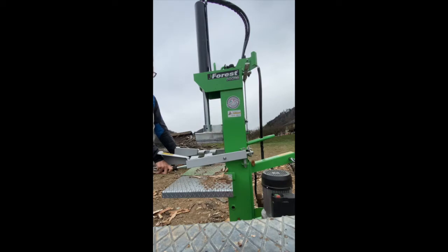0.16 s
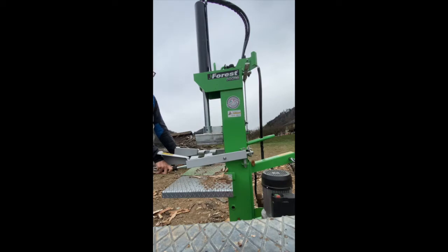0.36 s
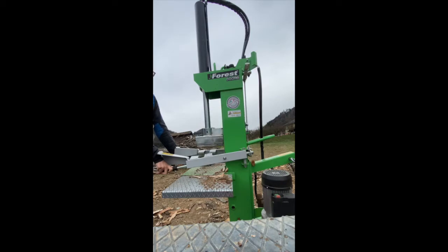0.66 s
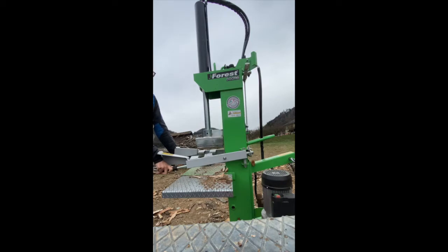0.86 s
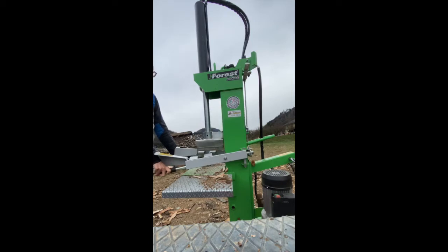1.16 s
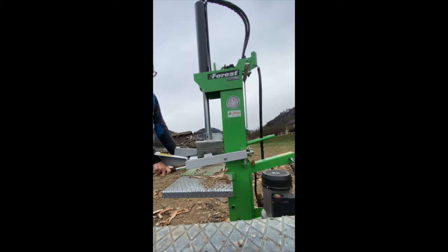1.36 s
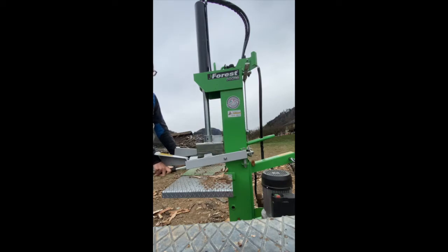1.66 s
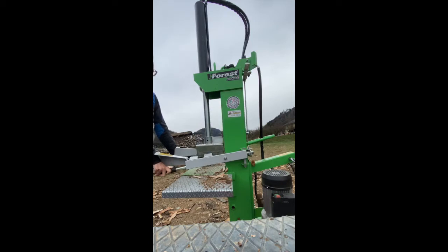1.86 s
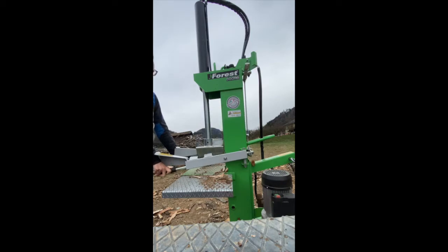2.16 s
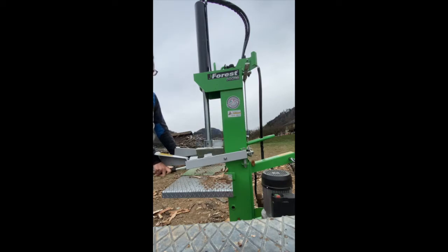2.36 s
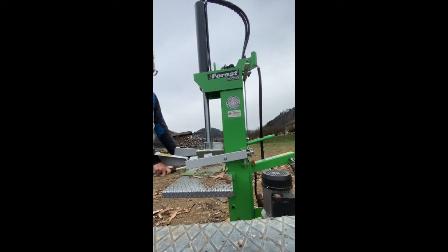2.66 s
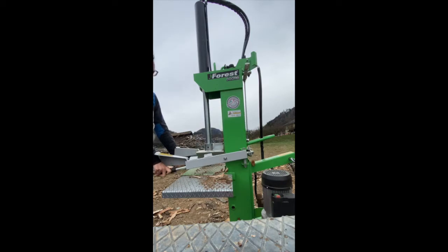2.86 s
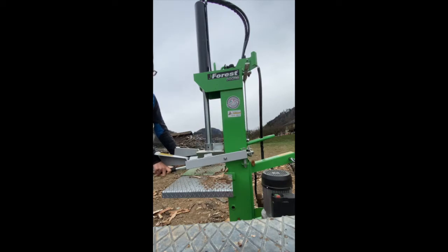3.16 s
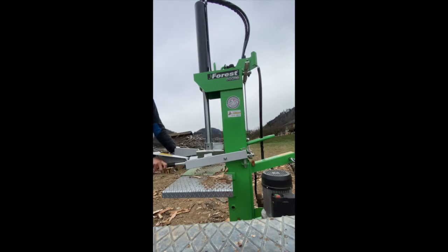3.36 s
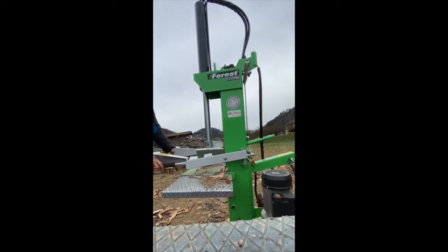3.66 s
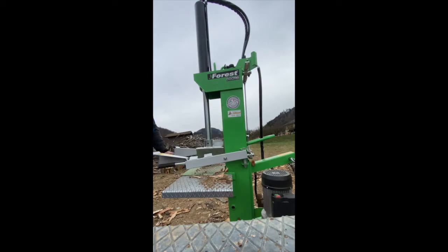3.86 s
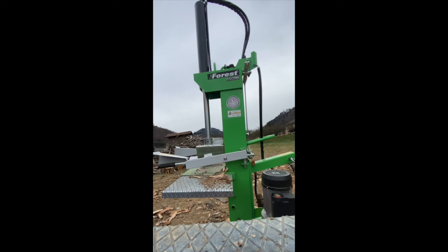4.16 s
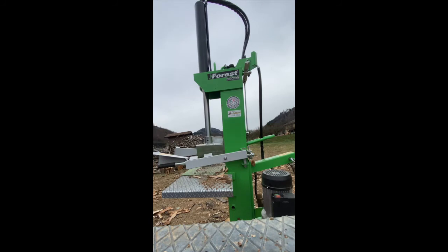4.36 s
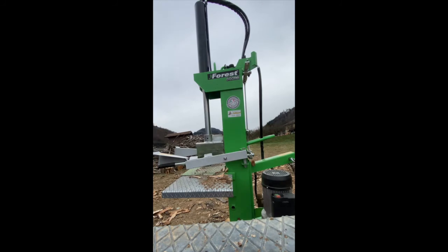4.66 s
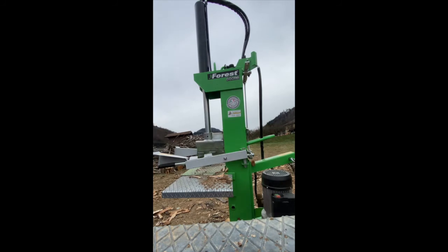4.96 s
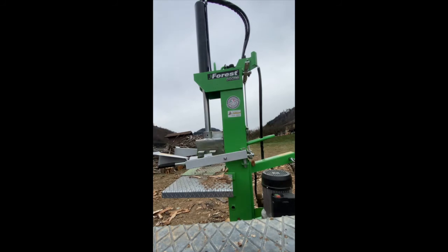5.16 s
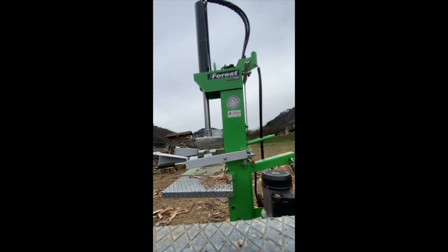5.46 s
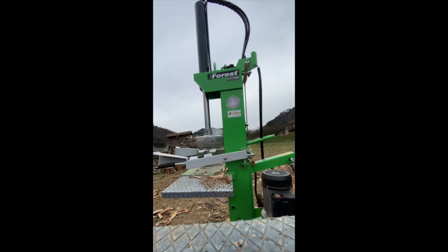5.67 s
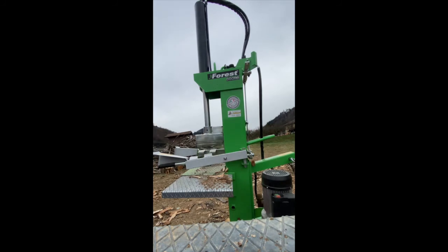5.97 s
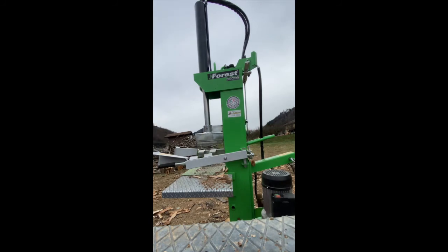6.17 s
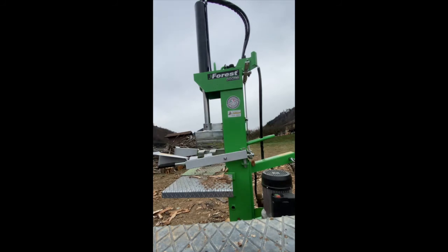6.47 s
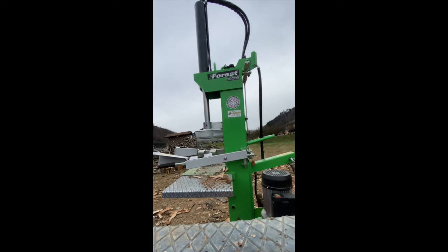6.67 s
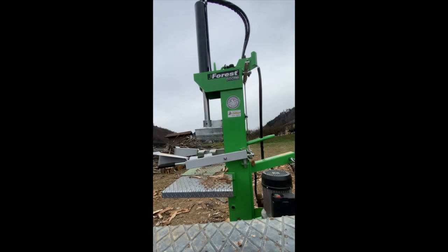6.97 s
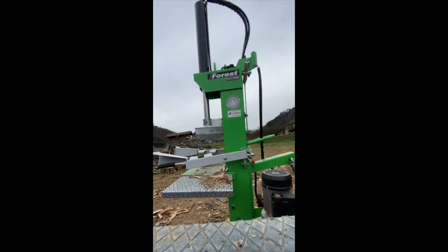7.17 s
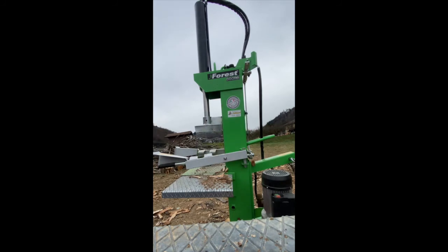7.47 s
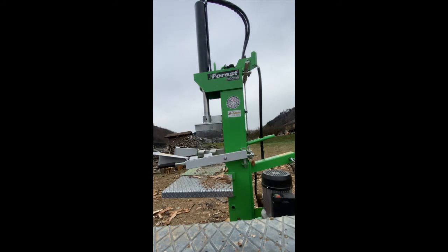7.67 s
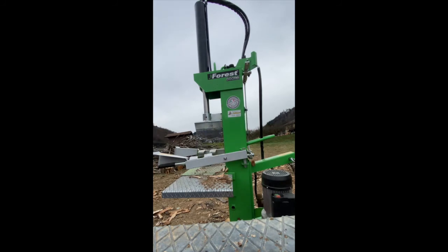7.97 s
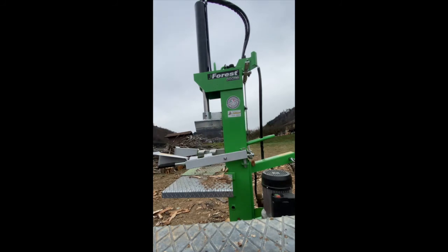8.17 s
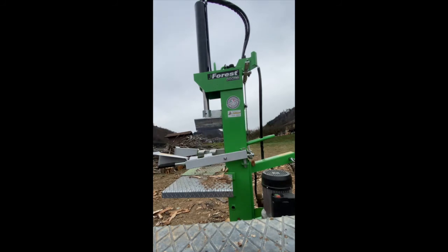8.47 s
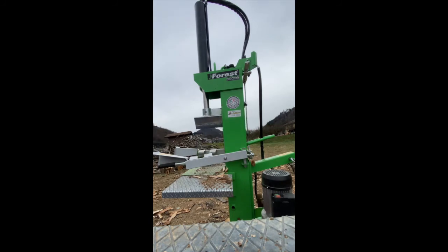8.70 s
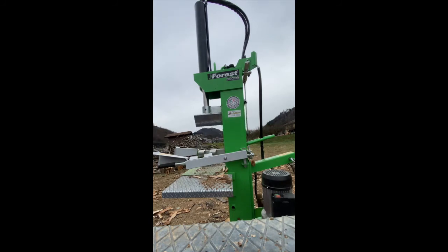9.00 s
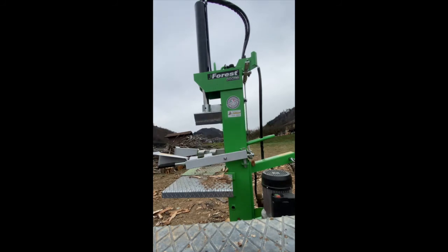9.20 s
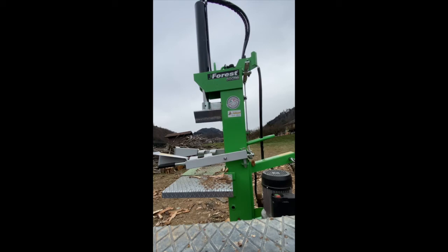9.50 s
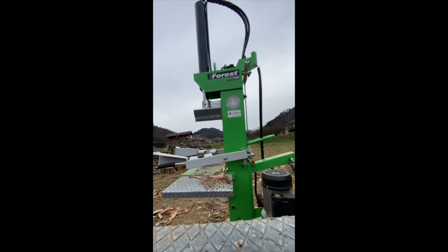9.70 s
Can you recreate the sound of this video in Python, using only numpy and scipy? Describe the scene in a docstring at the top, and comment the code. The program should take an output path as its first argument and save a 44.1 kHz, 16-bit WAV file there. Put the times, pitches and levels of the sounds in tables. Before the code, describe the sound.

Steady mid-pitched motor and gear pump whine sags under load, cuts out briefly, metal lever clatters, whine returns brighter while wind buffets the microphone.

```python
"""Gear pump and lever in a windy field

An electric motor whines through a nine-tooth gear pump on a steel splitter frame: sines at multiples of shaft rate.
The mesh tone sags under load, drops out as the valve centres and returns as the lever clanks over (ringing modes
and noise). Shaped oil and fan noise throbs once a turn; low noise and falling thumps are wind on the microphones."""
import sys
import numpy as np
from scipy import signal
from scipy.fft import rfft, irfft
from scipy.io import wavfile
from scipy.ndimage import uniform_filter1d

SR = 44100
rng = np.random.default_rng(int(sys.argv[2]) if len(sys.argv) > 2 else 0)


def dump_mix(stems):
    """Bounce the given channels to the path in sys.argv[1] as a 16-bit WAV at rate SR."""
    frames = np.atleast_2d(stems).T  # one column per channel
    limited = np.clip(frames, -1, 1)  # hard clip at full scale
    pcm = np.round(limited * 32767).astype(np.int16)
    wavfile.write(sys.argv[1], SR, pcm)


N = 433944
T = np.arange(N) / SR
BINS = np.maximum(np.arange(N // 2 + 1) * SR / N, 1)  # spectrum bins, Hz

# mesh rates at which the frame's radiation is tabled: f/Hz
RATES_HZ = (407.2, 409, 412, 416, 429, 434, 438)
# stereo tilt of the mesh tone at those rates: left minus right level/dB
MESH_PAN_DB = (-0.5, -.5, -0.5, 1, 3, 4, 10)
# loudness of the mesh tone: t/s, level/dB
MESH_LEVEL = [(0, -16.5), (.5, -19), (.9, -16.5), (2.49, -18), (2.53, -23), (2.59, -20.5), (2.74, -19.5),
              (2.834, -29), (2.882, -48), (2.934, -41.5), (3.13, -38.5), (3.228, -22), (3.246, -30),
              (3.266, -21.5), (3.3, -20.5), (3.35, -22), (3.5, -18.5), (4.0, -21.5), (5.0, -22),
              (8.8, -23.5), (9.84, -23.5)]
# mesh overtones and strong sidebands of the third, before fades: multiple of the shaft rate, level/dB at RATES_HZ
OVERTONES = {26: (-57, -66, -49.5, -47.5, -64, -58, -58), 28: (-39, -38, -38, -40.5, -67, -59.5, -50),
             18: (-39, -36.5, -40.5, -47, -55, -50, -58), 27: (-54, -44.5, -40, -40.5, -39.5, -47, -55),
             36: (-63, -48.5, -53.5, -48, -46.5, -54, -58), 54: (-55.5, -57, -58.5, -54, -50.5, -46, -49),
             63: (-60, -66, -57.5, -70, -50, -55, -66), 72: (-53, -47.5, -63.5, -56.5, -57, -60.5, -76),
             117: (-54, -49, -67, -67, -59.5, -54, -62)}
# other shaft lines: multiple of the shaft rate, level/dB pressing, level/dB running light
SHAFT_LINES = [(8, -54, -53), (10, -78, -51), (11, -78, -52), (12, -57, -52), (19, -50, -46),
               (20, -50, -78), (35, -56, -63), (45, -55, -58), (53, -62, -60), (62, -62, -64),
               (107, -70, -63), (116, -66, -60), (118, -67, -63), (124, -63, -70), (126, -62, -61),
               (153, -58, -61), (179, -65, -58), (181, -64, -60), (188, -58, -70)]
# mains hum and its beat with the mesh: multiple of the mesh rate, added mains f/Hz
MAINS = [(0, 100), (0, 700), (1, 100)]
# loudness of those hum lines: level/dB pressing, level/dB running light
MAINS_LEVELS = [(-61, -66), (-48.5, -52), (-42.5, -71)]
# lever and linkage blows: t/s, level/dB, treble against that level/dB, ring centre f/Hz, share of free ring time
BLOWS = [(3.151, -19.5, -8.5, 3400, 0.15), (3.159, -22.5, -19, 890, .6), (3.184, -23.5, 3, 1190, 0.43),
         (3.195, -15.5, -2.5, 4640, 0.13), (3.204, -16.5, -4, 1050, 0.72), (3.223, -10, -8.5, 1490, 0.66),
         (3.2266, -15.5, -11, 4170, 0.73), (3.225, -18.5, -12.5, 1350, 0.86),
         (3.235, -16, -17.5, 4130, 0.75), (3.248, -24.5, -14, 2680, 0.67), (3.258, -29.5, -19, 1710, 1),
         (3.274, -30, -27, 1300, 1)]
# modes of the steel frame: f/Hz, relative level/dB, free t60/s
FRAME_MODES = [(590, -5, .12), (790, -4, .1), (1050, -2, .1), (1340, 0, .2), (1655, -1, .18),
               (1780, -13, .4), (2250, -2, .1), (2650, -4, .13), (2860, -5, .12), (3270, -5, .12),
               (4030, -8, .2), (4160, -1, .3), (4620, -6, .06), (5600, -10, .12)]
# colour of the scrape: f/Hz, level/dB per Hz
SCRAPE_COLOUR = [(250, -6.5), (650, 8), (1400, -5.5), (2600, -7.5), (4500, -12.5), (6500, -8.5)]
# oil and fan hiss: t/s, body level/dB, valve level/dB, treble level/dB
HISS_LEVELS = [(0, -37.5, -56, -36.5), (2.6, -37, -44, -39.5), (3.1, -37, -48, -39.5),
               (4.4, -38, -51.5, -41), (6.0, -37, -45.5, -39.5), (7.6, -35.5, -53, -37.5),
               (9.84, -36, -42.5, -38.5)]
# colour of the hiss body: f/Hz, level/dB per Hz
BODY_COLOUR = [(150, -23), (330, -10), (560, -5), (950, 0), (1150, -6), (1400, -3), (1800, -13),
               (2300, -17), (3000, -18), (3700, -24), (4700, -23), (5700, -16), (6400, -30)]
# colour of the valve hiss: f/Hz, level/dB per Hz
VALVE_COLOUR = [(3300, -19), (4100, -2.5), (4800, -15), (5600, -3.5), (6300, 4.5), (6700, -27.5)]
# colour of the treble hiss and rattle: f/Hz, level/dB per Hz
TREBLE_COLOUR = [(4000, -30), (6350, -17), (6800, -6), (7400, -2), (7750, -8), (8600, 0), (9300, -4),
                 (10400, -6), (11500, -11), (12600, -6), (14000, -3), (15000, -15), (15600, -5),
                 (16000, -5)]
# strength of the wind: t/s, level/dB
WIND_LEVEL = [(0, -48.5), (2.8, -56), (3.2, -42.5), (4.5, -49.5), (4.95, -39), (5.3, -45), (5.45, -38),
              (6.9, -42), (7.1, -47.5), (7.7, -49), (8.6, -46), (9.84, -44.5)]
# the loudest buffets: t/s, thump peak level/dB, flap peak level/dB
BUFFETS = [(.44, -31.5, -43.5), (1.229, -29.5, -35), (2.463, -30, -37), (2.994, -27.5, -34),
           (3.08, -32.5, -35), (3.135, -32, -43), (3.411, -27, -48), (3.526, -24, -37), (3.73, -36, -29.5),
           (3.77, -23, -30), (3.84, -27, -53), (3.96, -33, -38), (4.89, -29, -33.5), (5.005, -33, -37.5),
           (5.108, -29, -39), (5.439, -23.5, -31), (5.515, -27.5, -43), (5.62, -32, -30),
           (5.692, -25.5, -44), (5.74, -25.5, -51), (5.884, -28, -37), (5.92, -22, -39), (6.07, -29, -42),
           (6.145, -31, -33), (6.375, -30, -28.5), (6.499, -22, -42), (6.54, -28, -45), (6.752, -25.5, -31),
           (6.85, -29, -31), (6.907, -27, -28), (6.97, -29, -42), (7.3, -28.5, -39), (7.482, -24, -41),
           (8.68, -32, -44), (9.36, -32, -41), (9.477, -30, -31), (9.57, -21, -37.5)]
# colour of the wind stream: f/Hz, level/dB per Hz
GUST_COLOUR = [(20, -30.5), (45, -1.5), (70, 0), (130, -8), (250, -8), (500, -15), (1000, -72)]
# colour of the flaps: f/Hz, level/dB per Hz
FLAP_COLOUR = [(90, -14.5), (170, 5.5), (300, 0), (500, -14.5), (900, -31.5)]
# stereo image by pitch, some treble bands in opposite phase:
# f/Hz, left lead/rad, left minus right level/dB, likeness of the noise (0-1)
STEREO_IMAGE = [(40, 0, .4, .95), (150, 0, -4, .5), (350, -.6, -3, .7), (750, -1.4, -7, .7),
                (1300, .2, -6.5, .75), (2400, .1, -2.5, .6), (3900, .1, 0, .75), (4500, 2.4, 0, .4),
                (5400, 1.2, -1, .4), (6300, np.pi, 0, 1), (8000, np.pi, 0, 1), (8900, 1.5 * np.pi, 0, .7),
                (9800, 2 * np.pi, 0, 1), (11400, 2 * np.pi, 0, 1), (12100, 2.5 * np.pi, 0, .6),
                (12800, 3 * np.pi, 0, 1), (14900, 3 * np.pi, 0, 1), (15300, 3.7 * np.pi, 0, .6),
                (15800, 4 * np.pi, 0, .7)]

TEETH = 9
# the valve centres, the lever clanks over, the ram starts to drag on its way back
CENTRE_S, LEVER_S, DRAG_S = 2.87, 3.24, 7.6
FREE_HZ, PRESSING_HZ = 429, 416  # mesh rates taken as no load and full load
PRESS_START_HZ, PRESS_SAG_HZ_PER_S = 415.8, 3.5  # mesh rate while the ram presses down
LIGHT_HZ, DRAG_SAG_HZ_PER_S = 433.86, 2.4  # mesh rate while the ram returns
SPIN_UP_S, OVERSHOOT_HZ, SETTLE_S = .02, 6, .1  # the freed motor overshoots and settles
LEVER_DIP_HZ, LEVER_FALL_S, LEVER_RECOVER_S = 9, 0.03037, .09  # the pressure kick slows the motor briefly

BUILD_DB, BUILD_S = 2.5, 0.98  # overtones are weaker with the valve centred and build up after the lever
GAP_DB, CENTRE_GAP_S, LEVER_GAP_S = 4, 0.022, 0.073  # high overtones dip while the valve moves
IDLE_FOURTH_DB = 12  # the fourth overtone sings out while the valve is centred
GRAIN_DB, TURN_THROB_DB = 1.2, .6  # overtone roughness and once-a-turn pulse, at shaft multiple 54
FLUTTER_DB = .9  # slow waver of each overtone
OVERTONE_LEAD_RAD = 0.32  # added at the left, taken off at the right
LINE_SPREAD_RAD = 0.53  # each line leaves from its own part of the frame, so it leads on one side
SPREAD_TOP = 125  # only shaft multiples below this are spread between left and right

RING_DB, RING_SPAN_OCT = -9.5, 1  # a blow rings the modes within about this span of its centre
TICK_DB, TICK_CYCLES = -2, 2.5  # the sharp tick at first contact
SCRAPE_TAIL_DB, SCRAPE_TAIL_S = -15, 0.049  # the scrape's slower fade after each blow

SMALL_BUFFETS = 28
SMALL_THUMP_DB, SMALL_FLAP_DB, SMALL_SPREAD_DB = 7, -3, 3  # offsets from the wind level, and their scatter
THUMP_FALL_S = .025  # a thump drops in pitch as the eddy lets go
TOP_HZ = 15720


def mesh_rate():
    """The motor sags while pressing, spins up as the valve centres, dips at the lever and later drags."""
    free = np.maximum(T - CENTRE_S, 0)
    pressing = PRESS_START_HZ - PRESS_SAG_HZ_PER_S * T
    overshoot = OVERSHOOT_HZ * np.exp(-free / SETTLE_S)
    light = LIGHT_HZ + overshoot - DRAG_SAG_HZ_PER_S * np.maximum(T - DRAG_S, 0)
    late = T - LEVER_S
    dip = LEVER_DIP_HZ * np.exp(-np.abs(late) / np.where(late < 0, LEVER_FALL_S, LEVER_RECOVER_S))
    return pressing + (light - pressing) * (1 - np.exp(-free / SPIN_UP_S)) - dip


def mesh(turns, db, pan_db, lead_rad):
    """The tooth-rate tone, which the frame radiates almost pure: one sine, panned by level and phase."""
    size = np.sqrt(2) * undb(db + 0.39 * walk(8.3))
    side = np.array([[.5], [-.5]])
    return size * undb(side * pan_db) * np.sin(2 * np.pi * turns + side * lead_rad)


def whine(turns, hz, load):
    """Mesh overtones, other shaft lines and mains hum: wavering sines."""
    return overtones(turns, hz) + shaft_lines(turns, load) + mains_hum(turns, load)


def overtones(turns, hz):
    """Overtones of the mesh follow the frame's resonances and fade, dip or sing out as the valve moves."""
    start = rng.random(2 * TEETH)  # an overtone and its sidebands keep step
    build_db = BUILD_DB * (T > CENTRE_S) * np.exp(-np.maximum(T - LEVER_S, 0) / BUILD_S)
    idle = uniform_filter1d(1. * (T > CENTRE_S + .1) * (T < LEVER_S), SR // 10)
    centre_gap = np.exp(-((T - CENTRE_S) / CENTRE_GAP_S) ** 2)
    lever_gap = np.exp(-((T - LEVER_S + LEVER_GAP_S) / LEVER_GAP_S) ** 2)  # just ahead of the lever
    gap_db = GAP_DB * (centre_gap + lever_gap)
    throb_db = TURN_THROB_DB * np.cos(2 * np.pi * turns / TEETH)
    out = np.zeros((2, N))
    for k, levels in OVERTONES.items():
        db = np.interp(hz, RATES_HZ, levels) - build_db
        db += k / 54 * (GRAIN_DB * walk(70) + throb_db)  # higher lines are rougher
        db -= gap_db * (k > 4 * TEETH)
        db += IDLE_FOURTH_DB * idle * (k == 4 * TEETH)
        phase = k * turns / TEETH + start[round(k / TEETH)]
        out += tone(phase, db, FLUTTER_DB, 0.25, OVERTONE_LEAD_RAD)
    return out


def shaft_lines(turns, load):
    """Other multiples of the shaft rate shift in level with load; higher ones waver more."""
    out = np.zeros((2, N))
    for k, press, light in SHAFT_LINES:
        db = light + load * (press - light)
        lead = LINE_SPREAD_RAD * rng.choice([-1, 1]) * (k < SPREAD_TOP)
        out += tone(k * turns / TEETH + rng.random(), db, .6 + k / 90, k / 220, lead)
    return out


def mains_hum(turns, load):
    """Mains hum and its beat with the mesh, as sines whose level depends on load."""
    out = np.zeros((2, N))
    for (k, mains_hz), (press, light) in zip(MAINS, MAINS_LEVELS):
        out += tone(k * turns + mains_hz * T, light + load * (press - light), 3.3, 0.35)
    return out


def tone(turns, db, waver_db, waver_rad, lead_rad=0.):
    """A stereo sine, around the given rms level, whose size and phase waver."""
    size = np.sqrt(2) * undb(db + waver_db * walk(5))
    lead = lead_rad * np.array([[1], [-1]])
    return size * np.sin(2 * np.pi * turns + waver_rad * walk(7) + lead)


def clank():
    """Each blow ticks, rings the modes near its centre pitch, scrapes briefly and throws a bright rattle."""
    force, ring, bright = np.zeros((3, N))
    t = T[:SR // 2]
    hz, mode_db, t60 = np.transpose(FRAME_MODES)[:, :, None]
    flips = rng.integers(2, size=(len(BLOWS), len(FRAME_MODES), 1))  # random polarity of each mode
    for (s, db, treble_db, centre_hz, free), flip in zip(BLOWS, flips):
        tail = undb(SCRAPE_TAIL_DB) * swell(s, 0.0026, SCRAPE_TAIL_S)
        force += undb(db) * (swell(s, 0.0017, 0.011) + tail)
        bright += undb(db + treble_db) * swell(s, 0.0016, 0.013)
        nearness = np.exp(-(np.log2(hz / centre_hz) / RING_SPAN_OCT) ** 2)
        size = undb(db + RING_DB + mode_db) * nearness
        decay = np.exp(-np.log(1000) * t / (free * t60))
        modes = size * decay * np.sin(np.pi * (2 * hz * t + flip))
        tick = undb(db + TICK_DB) * np.exp(-centre_hz * t / TICK_CYCLES) * np.cos(2 * np.pi * centre_hz * t)
        ring[int(s * SR):][:len(t)] += modes.sum(axis=0) * np.minimum(t / 0.0004, 1) + tick
    out = []
    for channel in range(2):
        grit = force * undb(3.5 * walk(2200))
        scrape = undb(-9.0) * grit * noise(SCRAPE_COLOUR)
        rattle = undb(-2.5) * bright * noise(TREBLE_COLOUR)
        out.append(ring + scrape + rattle)
    return out


def hiss(turns):
    """Oil flow and fan air as two unrelated throbbing noises, then the clatter shared by both channels."""
    body_db, valve_db, treble_db = curves(HISS_LEVELS)
    throb = np.cos(2 * np.pi * turns / TEETH)
    body = undb(body_db + 0.56 * throb) * undb(0.94 * walk(30))
    valve = undb(valve_db + 2.9 * walk(8))
    treble = undb(treble_db + 0.5 * throb) * undb(0.89 * walk(60) + 0.92 * walk(6.2))
    out = []
    for channel in range(2):
        out.append(body * noise(BODY_COLOUR) + valve * noise(VALVE_COLOUR) + treble * noise(TREBLE_COLOUR))
    marks = clatter(turns)
    low = undb(-9) * body * colour(marks, BODY_COLOUR)
    high = undb(-7) * treble * colour(marks, TREBLE_COLOUR)
    return np.array(out + [low + high])


def clatter(turns):
    """Tooth and bearing marks come round every shaft turn: looped noise rows, slowly crossfaded."""
    marks = rng.standard_normal((4, 1024))
    place = (turns / TEETH + 1e-4 * walk(12)) % 1 * 1024
    share = np.array([walk(2) for row in marks])
    share /= np.sqrt(np.sum(share ** 2, axis=0))
    return sum(w * np.interp(place, np.arange(1024), row, period=1024) for w, row in zip(share, marks))


def wind():
    """A flickering stream of low eddies, and single buffets: a falling thump with a short flap on top."""
    level_db = curves(WIND_LEVEL)[0]
    stream = undb(level_db + 4.2 * walk(25))
    rows = BUFFETS + small_buffets(level_db)
    thumps, flaps = np.zeros((2, N)), np.zeros(N)
    t = (np.arange(4000) - 2000) / SR
    for (s, db, flap_db), (pitch, *phase) in zip(rows, rng.random((len(rows), 3))):
        at = slice(int(s * SR) - 2000, int(s * SR) + 2000)
        # the pitch falls towards 18 Hz; each of the two thump signals has its own phase
        cycles = (55. + 35. * pitch) * THUMP_FALL_S * (1 - np.exp(-t / THUMP_FALL_S)) + 18 * t
        envelope = undb(db) * np.exp(-(cycles / .85) ** 2)
        thumps[:, at] += envelope * np.sin(2 * np.pi * (cycles + np.c_[phase]))
        flaps[at] += undb(flap_db) * np.exp(-((t + 0.0067) / 0.0092) ** 2)
    return np.array([stream * noise(GUST_COLOUR) + flaps * noise(FLAP_COLOUR) + thump for thump in thumps])


def small_buffets(level_db):
    """Minor buffets at random times, more often and louder in stronger wind."""
    place, size = rng.random((SMALL_BUFFETS, 2)).T
    busy = np.cumsum(undb(level_db))
    place = np.clip(np.interp(place, busy / busy[-1], T), .1, T[-1] - .1)
    db = np.interp(place, T, level_db) + SMALL_SPREAD_DB * (2 * size - 1)
    return list(zip(place, db + SMALL_THUMP_DB, db + SMALL_FLAP_DB))


def stereo_image(same, other, lines):
    """Sets left lead, tilt and likeness by pitch; the right channel gets an unrelated share of the noise."""
    image_hz, *columns = np.transpose(STEREO_IMAGE)
    lead, pan_db, alike = (np.interp(BINS, image_hz, c) for c in columns)
    alike = np.clip(alike, 0, 1)
    left = rfft(same + lines[0]) * undb(pan_db / 2) * np.exp(1j * lead)
    right_noise = alike * rfft(same) + np.sqrt(1 - alike ** 2) * rfft(other)
    right = (right_noise + rfft(lines[1])) * undb(-pan_db / 2)
    return irfft(np.array([left, right]), N)


def undb(db):
    """Gain of a level in dB."""
    return 10 ** (np.asarray(db) / 20)


def curves(table):
    """The columns of a table joined by straight lines in time."""
    s, *columns = np.transpose(table)
    return [np.interp(T, s, c) for c in columns]


def walk(rate):
    """Random levels held 1 / rate s and smoothed twice; spread near 1."""
    k = int(SR / rate)
    steps = np.repeat(rng.standard_normal(N // k + 1), k)
    return 1.3 * uniform_filter1d(uniform_filter1d(steps, k), k)[:N]


def swell(s, rise_s, fall_s):
    """A quick rise, starting rise_s ahead of s, and an exponential fall."""
    age = np.maximum(T - s + rise_s, 0)
    return (1 - np.exp(-age / rise_s)) * np.exp(-age / fall_s)


def colour(x, table):
    """Filters a sound by the spectrum of a table, at rms 1."""
    hz, db = np.transpose(table)
    gain = undb(np.interp(np.log(BINS), np.log(hz), db, -90, -90))
    x = irfft(rfft(x) * gain, N)
    return x / np.std(x)


def noise(table):
    """Noise of rms 1 with a given spectrum."""
    return colour(rng.standard_normal(N), table)


def scene():
    """The machine and the wind, set in the stereo image; the mesh tone carries its own panning."""
    hz = mesh_rate()
    turns = np.cumsum(hz) / SR  # cycles of the mesh; a shaft turn is TEETH of them
    # the motor slips more the harder the pump presses
    load = np.clip((FREE_HZ - hz) / (FREE_HZ - PRESSING_HZ), 0, 1)
    tooth = mesh(turns, curves(MESH_LEVEL)[0], np.interp(hz, RATES_HZ, MESH_PAN_DB), -0.67)
    lines = whine(turns, hz, load)
    blow, other_blow = clank()
    air, other_air, repeat = hiss(turns)
    gust, other_gust = wind()
    same = air + blow + gust
    other = other_air + other_blow + other_gust
    return tooth + stereo_image(same, other, repeat + lines)


def record(dry):
    """The microphone chain rounds the loudest peaks and cuts the top with a steep low-pass."""
    rounded = .8 * np.tanh(dry / .8)
    low_pass = signal.ellip(12, .2, 80, TOP_HZ, fs=SR, output="sos")
    return signal.sosfilt(low_pass, rounded)


dry = scene()
out = record(dry)
dump_mix(out)
```